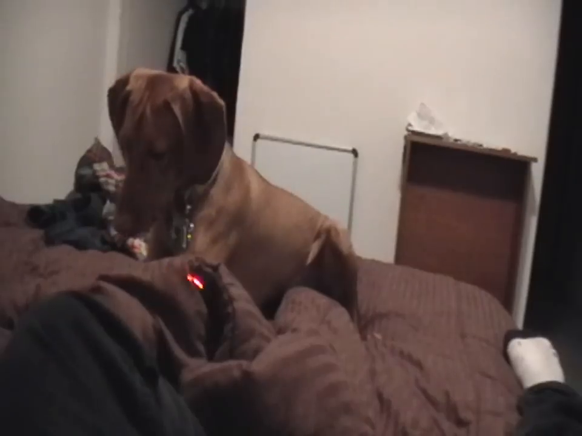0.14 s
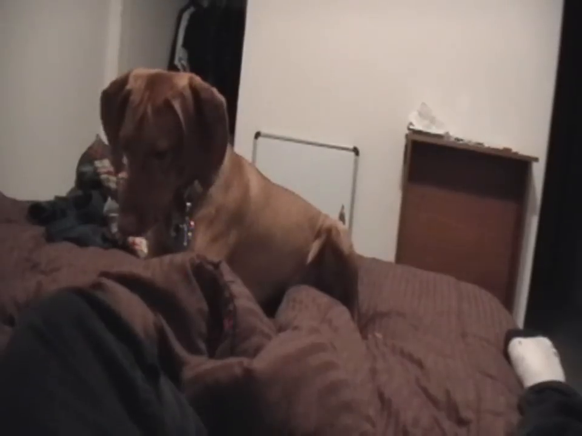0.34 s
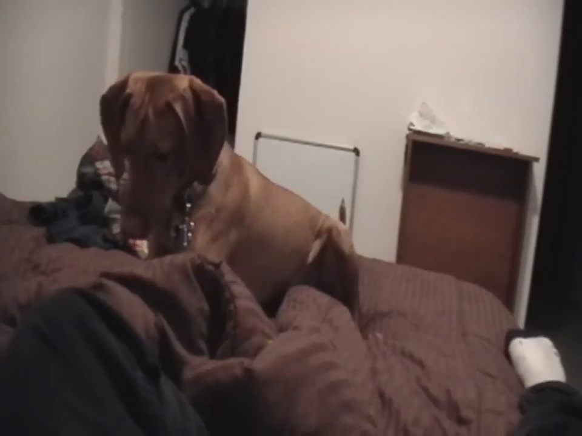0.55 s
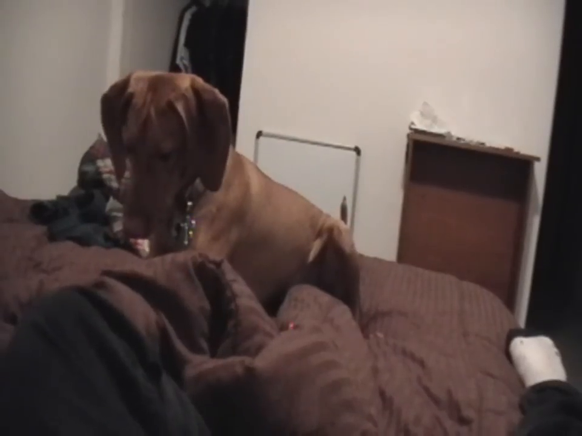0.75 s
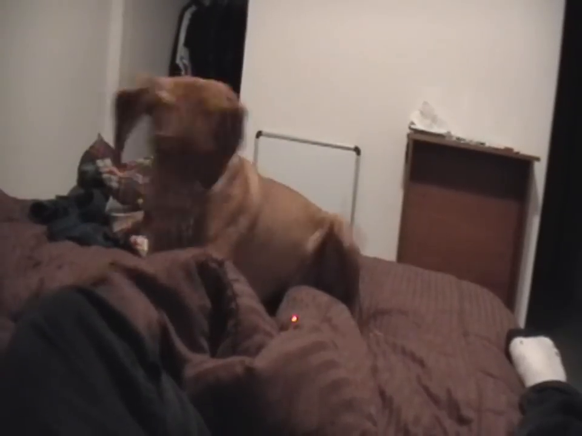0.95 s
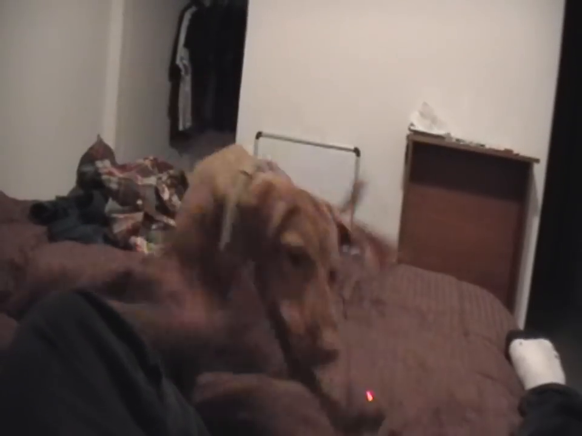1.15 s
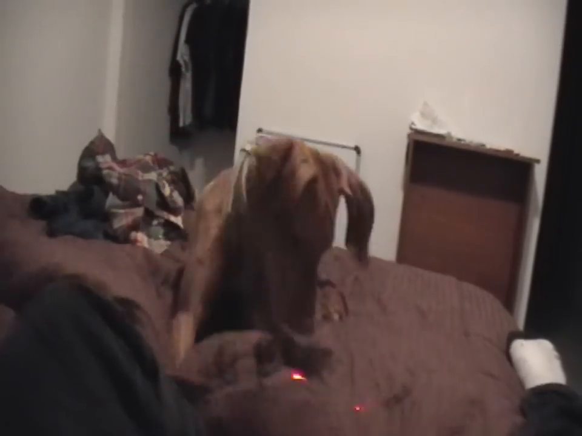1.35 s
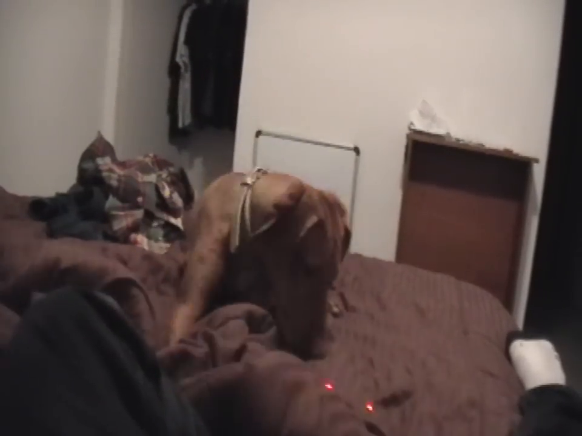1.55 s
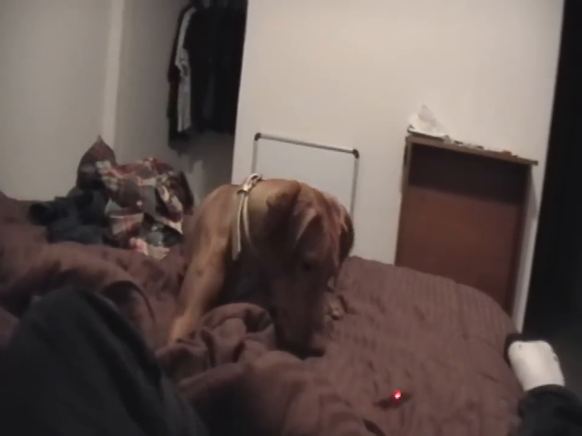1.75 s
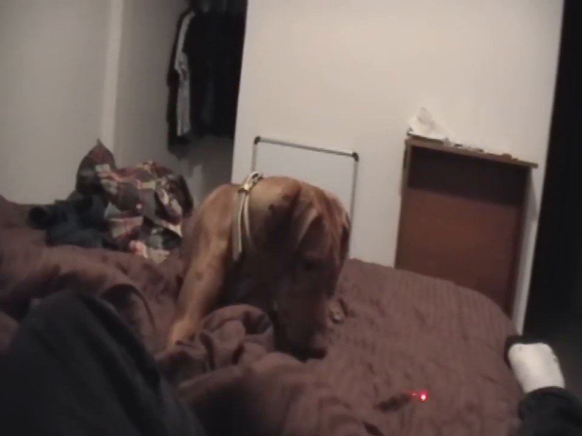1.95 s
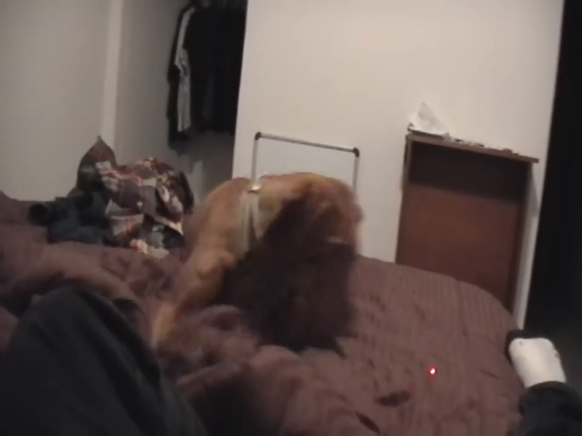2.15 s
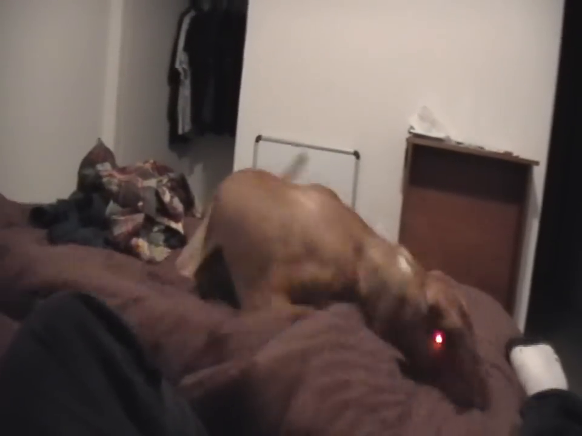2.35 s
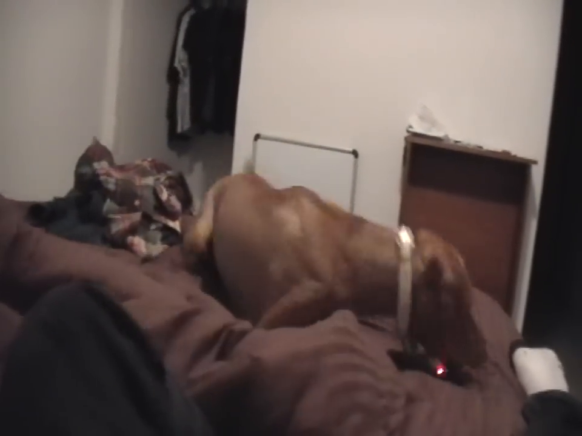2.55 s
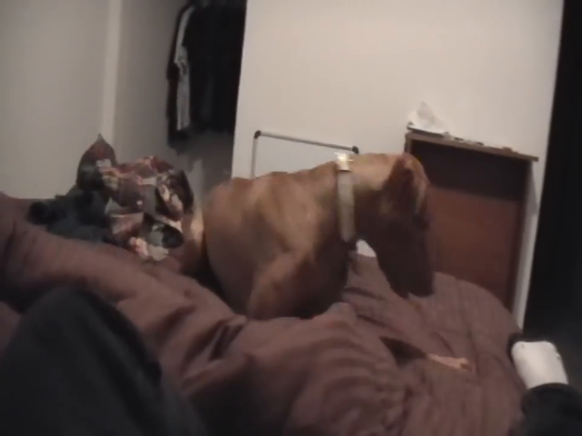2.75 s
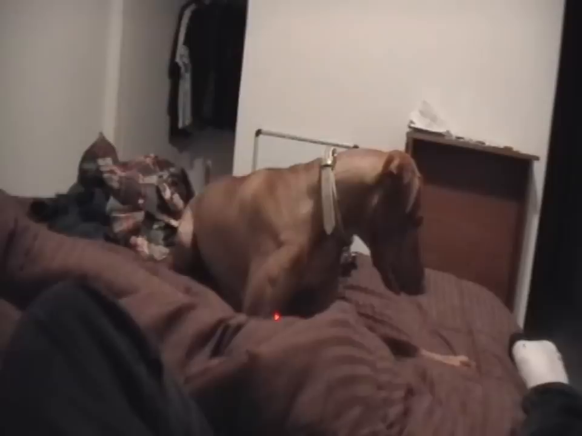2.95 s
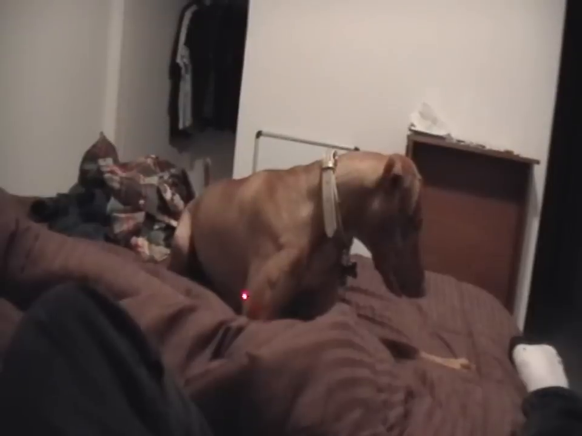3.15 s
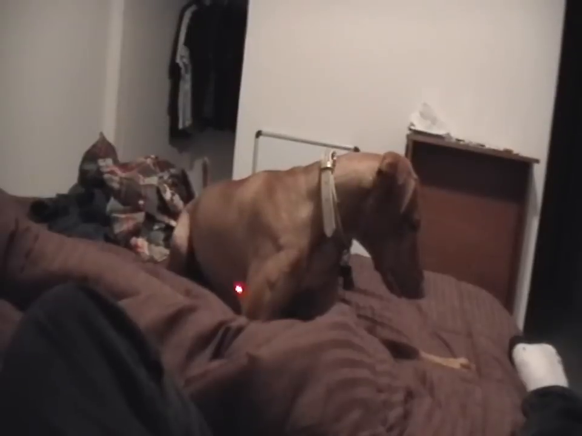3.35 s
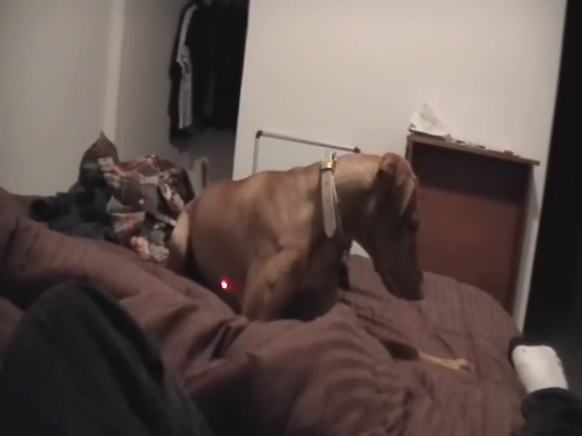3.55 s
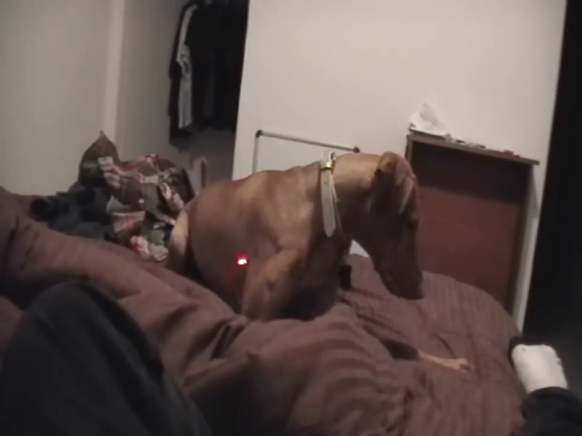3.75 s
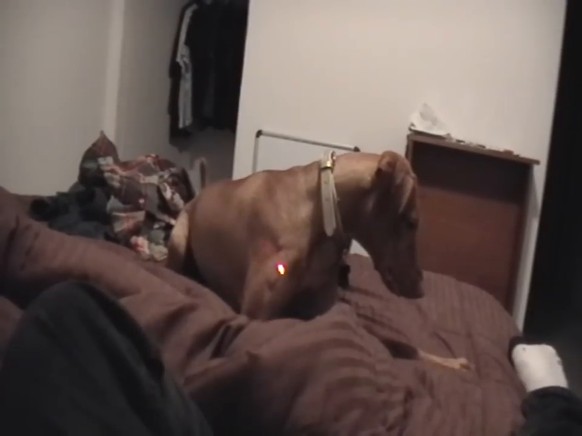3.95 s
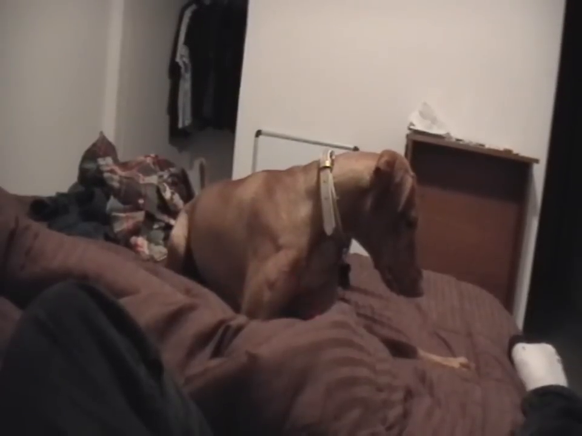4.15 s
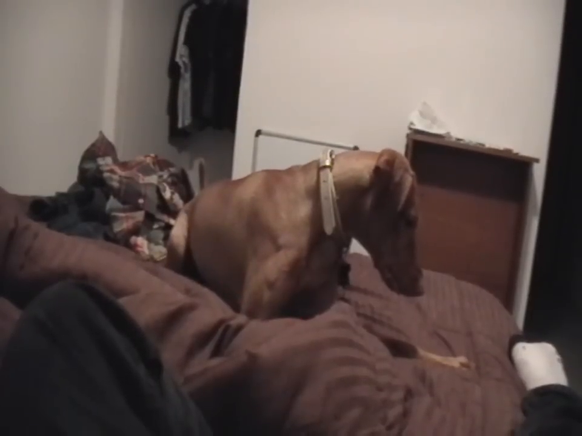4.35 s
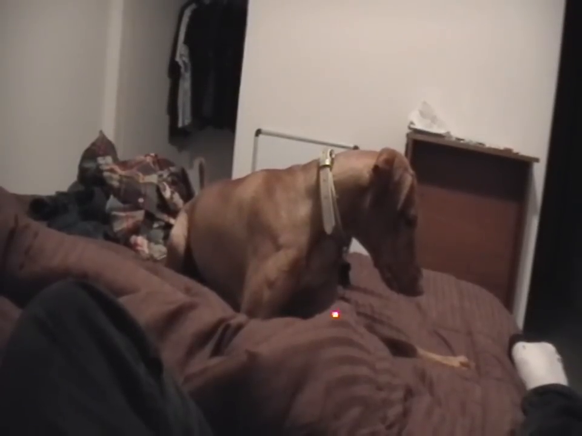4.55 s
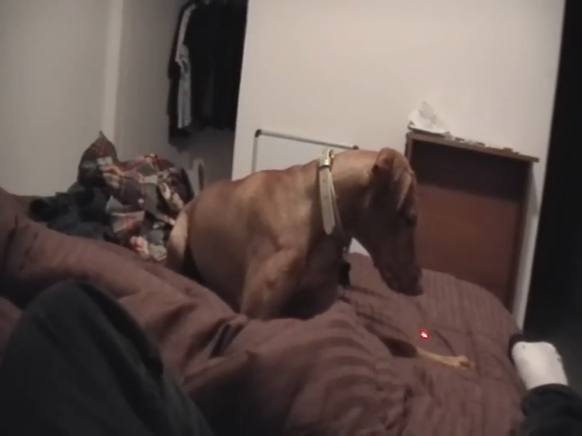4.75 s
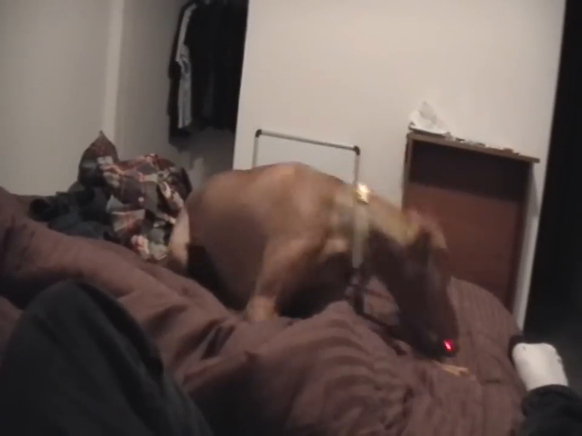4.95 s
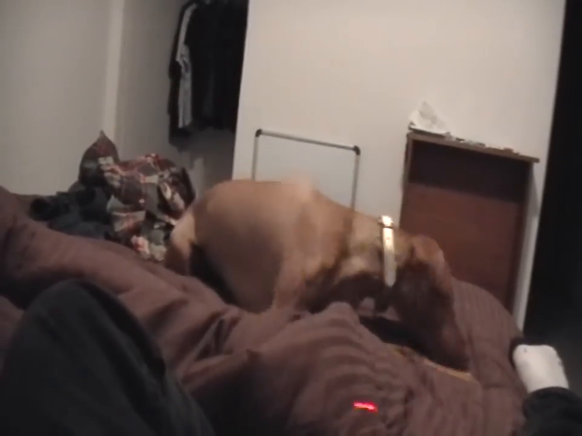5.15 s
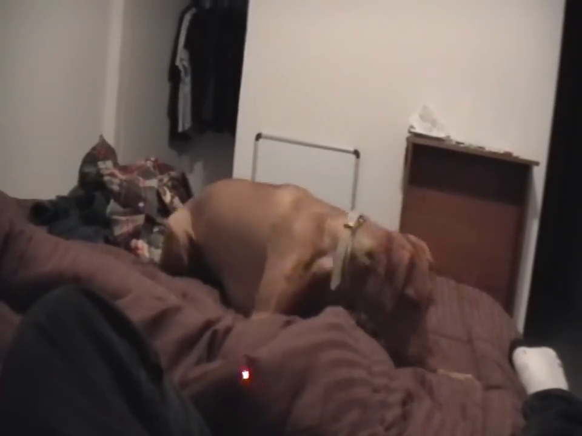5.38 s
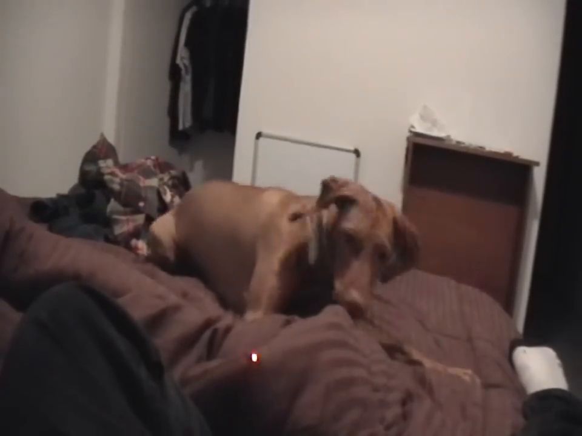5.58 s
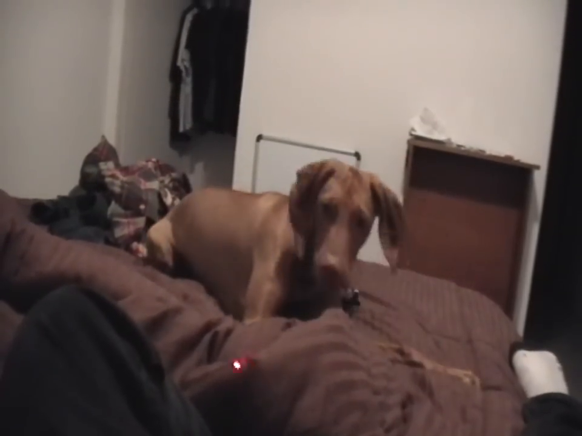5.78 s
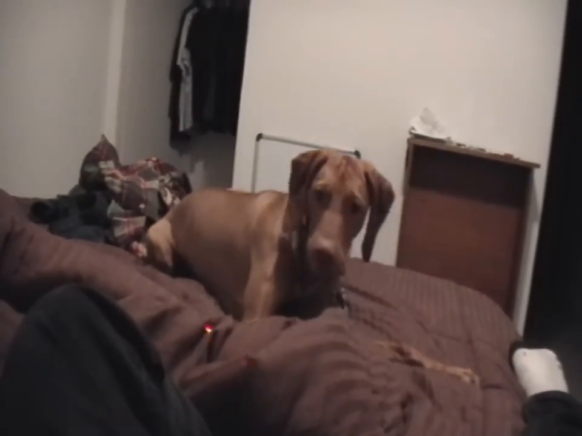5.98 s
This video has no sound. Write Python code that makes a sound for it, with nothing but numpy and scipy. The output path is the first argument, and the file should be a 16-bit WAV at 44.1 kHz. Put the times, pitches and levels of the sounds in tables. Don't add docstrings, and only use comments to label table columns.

```python
import sys
import numpy as np
from scipy import signal
from scipy.fft import rfft, irfft, next_fast_len
from scipy.io import wavfile
from scipy.ndimage import map_coordinates

SR = 44100
rng = np.random.default_rng(int(sys.argv[2]) if len(sys.argv) > 2 else 0)


def linear_from_db(decibels):
    return 10 ** (np.asarray(decibels, float) / 20)


def generate_wav(signal):
    frames = np.transpose(np.atleast_2d(signal))
    scaled = np.clip(frames, -1, 1) * 32767
    pcm = np.round(scaled).astype(np.int16)
    wavfile.write(sys.argv[1], SR, pcm)


N = 265437


def unit(x):
    return x / np.sqrt(np.mean(x ** 2) + 1e-20)


def along(points, hz):
    point_hz, value = np.transpose(points)
    return np.interp(np.log(hz + 1), np.log(point_hz + 1), value)


def wobble(rate, count=64):
    at = np.arange(0, N + count, count)
    knots = rng.standard_normal(int(N * rate / SR) + 4)
    return np.interp(np.arange(N), at, map_coordinates(knots, [at * rate / SR]))


def filtered(x, response):
    size = next_fast_len(N + SR // 2)
    hz = np.fft.rfftfreq(size, 1 / SR)
    return irfft(rfft(x, size) * response(hz), size)[..., :N]


def modes(peaks):
    def response(f):
        total = 0
        for k, (hz, width, db) in enumerate(peaks):
            loss = 1j * f * width
            total = total + (-1) ** k * linear_from_db(db) * loss / (hz * hz - f * f + loss)
        return total
    return response


def shaped(spectrum):
    return lambda hz: linear_from_db(along(spectrum, hz))


def spread(pair, response, alike):
    def mix(hz):
        turn = np.arccos(np.clip(along(alike, hz), -1, 1)) / 2
        return response(hz) * [np.cos(turn), np.sin(turn)]
    mid, side = filtered(pair, mix)
    return np.array([mid + side, mid - side])


# pitch in Hz, likeness from -1 to 1.
BED_LIKENESS = [(60, 1), (240, 1), (950, 0.83), (3770, 0.61), (15000, 0.67)]


def rush(response, alike=BED_LIKENESS):
    return unit(spread(rng.standard_normal((2, N)), response, alike))


def swells(rows, lift=0):
    t = np.arange(0, N + 32, 32) / SR
    power = 0
    for row in rows:
        peak_s, level_db, rise_s, fall_s = row[:4]
        away = np.maximum((peak_s - t) / rise_s, (t - peak_s) / fall_s)
        steep = away + 0.16 * away ** 3
        power = power + linear_from_db(2 * (level_db + lift * row[-1] - 20 * np.minimum(steep, 6)))
    return np.interp(np.arange(N) / SR, t, 10 * np.log10(power + 1e-14))


# pitch in Hz, level in dB per Hz.
AIR_COLOUR = [(15, -52.5), (25, -15.5), (90, -13), (108, 0), (130, -7), (144, -0.5), (257, -12.5),
              (380, -5.5), (494, -22.5), (548, -2.5), (750, -42), (833, -31.5), (1030, -9.5), (1730, -16.5),
              (13000, -39)]
# pitch in Hz, likeness from -1 to 1.
AIR_LIKENESS = [(60, 0.78), (240, -0.087), (950, -0.89), (3770, 0.075), (15000, 0.56)]
# pitch in Hz, rms level in dB.
MACHINE_TONES = [(118.4, -69), (376.8, -70), (608.3, -74.5), (845.2, -74), (1685, -78.5), (2530, -85.5),
                 (3957, -86)]


def air():
    t = np.arange(N) / SR
    swell, drift = linear_from_db(1.4 * wobble(12)), 0.81 * wobble(15)
    hum = sum(linear_from_db(db + 3) * np.sin(2 * np.pi * hz * t + drift) for hz, db in MACHINE_TONES)
    return linear_from_db(-64 + 5) * rush(shaped(AIR_COLOUR), AIR_LIKENESS) + swell * hum


# pitch in Hz, level in dB per Hz.
EARLY_COLOUR = [(24, -53), (40, -16), (363, -12), (499, -21), (878, -1.5), (2340, -25), (10700, -33),
                (14000, -46)]


def early_rustle():
    return linear_from_db(-43.5 + 1.5 * wobble(39)) * rush(shaped(EARLY_COLOUR))


# pitch in Hz, width in Hz, level in dB.
MATTRESS_MODES = [(89, 45.5, -2.5), (129.2, 34.3, 1.5), (200.4, 79, -7)]
# pitch in Hz, width in Hz, level in dB.
QUILT_MODES = [(214, 87, -1), (327, 89, 2), (439.7, 61, -3)]
# pitch in Hz, level in dB per Hz.
CLOTH_COLOUR = [(400, -40.5), (540, -9.5), (780, -2), (1200, -12.5), (1700, -14), (3200, -24),
                (4800, -29.5), (9000, -46.5), (14000, -69)]
# peak in seconds, level in dB, rise in seconds, fall in seconds per 20 dB.
WEIGHT_SHIFTS = [(.19, -43.5, 0.17, 2), (.55, -41, 0.99, 0.5), (.9, -32.5, 0.14, 0.21),
                 (1.15, -44.5, 0.55, 0.7), (1.37, -40.5, 0.14, 0.05), (1.86, -41.5, 0.064, 0.1),
                 (2.15, -36, 0.16, 0.27), (2.455, -32, 0.096, 0.1), (2.57, -39, .08, 0.05),
                 (2.7, -34.5, 0.085, 0.1747), (2.82, -49.5, .1, 0.4), (4.145, -38.5, 0.038, 0.15),
                 (4.62, -44, 0.056, 0.22), (5.1, -49.5, 0.17, 0.25), (5.57, -53, 0.14, .17),
                 (6.01, -63, .2, 2)]
# peak in seconds, level in dB, rise in seconds, fall in seconds per 20 dB,
# cloth over quilt in dB.
COVER_DRAGS = [(.11, -65, .02, 2, -3), (1.15, -40.5, .13, 0.32, -5.5), (1.22, -35, 0.026, 0.15, 4),
               (1.285, -31, 0.19, 0.0471, -17.5), (1.44, -43, 0.17, 0.29, 2),
               (1.605, -44.5, 0.019, 0.19, 1), (2.285, -47.5, 0.052, 0.23, -4),
               (2.42, -34.5, 0.089, 0.237, -4.5), (2.58, -46.5, .1, 0.04, -8),
               (2.69, -42.5, 0.096, 0.1457, 3.5), (2.82, -55, .08, 0.2, -2), (5.0, -47, 0.059, 0.32, 2.5),
               (5.12, -57.5, 0.061, 0.56, 7), (5.42, -55.5, 0.045, 0.8, -12)]
BED_REST_DB = [-67.5, -67.5, -67.5]


def bed():
    def together(*levels):
        return 10 * np.log10(sum(linear_from_db(2 * db) for db in levels))
    weight_db = swells(WEIGHT_SHIFTS)
    pressed_db = -58.5 + 0.35 * (weight_db + 45)
    mattress_db = together(weight_db, BED_REST_DB[0])
    quilt_db = together(swells(COVER_DRAGS), pressed_db, BED_REST_DB[1])
    cloth_db = together(swells(COVER_DRAGS, lift=0.9), BED_REST_DB[2])
    lump = wobble(14)
    boom = linear_from_db(mattress_db - 0.5 + 1.5 * lump) * rush(lambda f: modes(MATTRESS_MODES)(f) ** 2)
    thud_db = quilt_db + 0.41 * lump + 1.4 * wobble(25)
    thud = linear_from_db(thud_db) * rush(lambda f: modes(QUILT_MODES)(f) ** 2)
    rustle = linear_from_db(cloth_db + 0.59 * wobble(40)) * rush(shaped(CLOTH_COLOUR))
    return boom + thud + rustle


# start in seconds, peak in dB, pitch in Hz, time to fade 60 dB in seconds.
LANDINGS = [
    (1.837, -29, 96, 0.1),
    (2.409, -29, 275, .04),
    (2.436, -26.5, 260, 0.048),
    (2.454, -27, 300, .04),
    (2.474, -28, 247, .05),
    (2.55, -32, 253, .05),
    (2.617, -33.5, 280, .05),
    (2.656, -19.5, 125, 0.08),
    (4.123, -35.5, 126.5, .11),
    (4.599, -42, 80.7, 0.1),
]


def thumps():
    out, t = np.zeros(N + SR), np.arange(SR // 3) / SR
    for s, db, hz, t60 in LANDINGS:
        onset = 1 - np.exp(-t * hz / 0.8)
        swing = linear_from_db(db + 4.0 - 60 * t / t60) * onset * np.sin(2 * np.pi * hz * t)
        out[round(s * SR):][:len(t)] += swing
    return out[:N]


# peak in seconds, level in dB, rise in seconds, fall in seconds per 20 dB.
CLAW_SCUFFS = [
    (.11, -54, 0.0085, 0.3),
    (1.09, -56, 0.043, 0.3),
    (1.23, -55, 0.044, .3),
    (1.62, -51, .02, 0.17),
    (1.9, -67.5, .15, .2),
    (2.3, -55, .08, 0.6),
    (2.57, -44.5, .05, 0.05),
    (5.0, -54.5, 0.097, 0.64),
    (5.53, -55, 0.052, 0),
    (5.9, -72, .15, -5.5),
]
# pitch in Hz, level in dB per Hz.
WEAVE_COLOUR = [(1200, -30), (2000, -3.5), (2400, 0), (3400, -2.5), (5000, -8.5), (8000, -29.5)]
# start in seconds, length in seconds, first pitch in Hz, last pitch in Hz, level in dB.
NOSE_WHISTLE = (3.39, .13, 2680, 2330, -73)


def claws():
    s, length, from_hz, to_hz, db = NOSE_WHISTLE
    u = np.clip((np.arange(N) / SR - s) / length, 0, 1)
    phase = 2 * np.pi * np.cumsum(from_hz + (to_hz - from_hz) * u) / SR
    whistle = linear_from_db(db + 3.5 + 2.5 * wobble(39.9)) * np.sin(np.pi * u) ** 0.6 * np.sin(phase)
    return linear_from_db(swells(CLAW_SCUFFS) + 1.8 * wobble(45)) * rush(shaped(WEAVE_COLOUR)) + whistle


# pitch in Hz, width in Hz, level in dB.
LOOP_MODES = [(4080, 260, 0), (4270, 300, -3)]
# peak in seconds, level in dB, rise in seconds, fall in seconds per 20 dB.
LOOP_NUDGES = [
    (1.1, -52, .01, .03),
    (2.875, -62, .005, .06),
    (2.98, -61, .04, .2),
    (3.183, -58, .004, .06),
    (3.385, -67, .005, .2),
    (5.46, -60, .03, .1),
    (5.7, -62, .02, .2),
    (5.86, -59, .012, .08),
    (5.2, -59, .04, .12),
    (5.93, -65, .02, .15),
]


def loop():
    flutter_db = 2.5 * wobble(40) - 2
    return linear_from_db(swells(LOOP_NUDGES) + flutter_db) * rush(lambda f: modes(LOOP_MODES)(f) ** 2)


# start
# in seconds, rms level in dB, pitch in Hz, time to fade 60 dB in seconds.
COVER_PATS = [(1.085, -55, 818, .1), (1.158, -43, 800, 0.046), (1.206, -26, 340, .45),
              (1.206, -32, 756, 0.28), (1.207, -43, 1490, .25), (1.207, -44, 2480, 0.23),
              (1.42, -38, 774, 0.19), (1.598, -39, 720, 0.14), (1.6, -49, 3300, 0.17),
              (2.344, -41.5, 830, 0.093), (2.44, -38.5, 900, .12), (2.68, -39, 750, .3),
              (2.911, -44, 1700, 0.034), (4.99, -45.5, 776, 0.36), (4.99, -59, 2250, .4),
              (4.99, -60, 3450, .2), (5.11, -51, 820, .15), (5.13, -56, 2300, .3), (5.516, -49, 2300, .2)]


def pats():
    out, t = np.zeros(N + SR), np.arange(SR // 2) / SR
    f = np.fft.rfftfreq(len(t), 1 / SR)
    for s, db, hz, t60 in COVER_PATS:
        band = modes([(hz, 0.14 * hz, 0)])(f)
        front = 1 + 2.25 * linear_from_db(-60 * t / 0.0055)
        puff = rng.standard_normal(len(t)) * linear_from_db(-60 * t / t60) * front
        hollow = irfft(rfft(puff) * band, len(t)) / np.sqrt(np.mean(np.abs(band) ** 2))
        out[round(s * SR):][:len(t)] += linear_from_db(db) * hollow
    return out[:N]


# start in seconds, peak in dB, time to fade 60 dB in seconds.
PAW_SLAPS = [
    (1.205, -20.5, 0.53),
    (1.597, -34, 0.12),
    (2.43, -33, 0.17),
    (4.98, -40.5, 0.25),
]
# pitch in Hz, width in Hz, level in dB.
SLAP_MODES = [(279, 320, 2.5), (691, 160, -2.5), (1345, 37, -5), (1512, 17.5, 1.5)]


def paws():
    push, t = np.zeros(N + SR), np.arange(SR // 2) / SR
    for s, db, t60 in PAW_SLAPS:
        front = 1 + 5 * linear_from_db(-60 * t / 0.0063)
        flutter = linear_from_db(db + 4.5 - 60 * t / t60) * rng.standard_normal(len(t)) * front
        push[round(s * SR + 70):][:len(t)] += flutter

    def covers(f):
        notch = 1 - modes([(500, 130, 0)])(f)
        return modes(SLAP_MODES)(f) * notch / (1 + 1j * f / 2500)
    return filtered(push[:N], covers)


# pitch in Hz, level in dB, time to fade 60 dB in seconds.
SMALL_TAG = [(11400, 3, 0.12), (11480, 1, 0.12), (11350, -2, 0.07), (11440, -4, .18)]
# pitch in Hz, level in dB, time to fade 60 dB in seconds.
LARGE_TAG = [(6860, -3.5, 0.22), (6980, -1, 0.11), (6610, -5.5, 0.079)]
# pitch in Hz, level in dB per Hz.
LINK_COLOUR = [(900, -38), (1500, -13), (3200, -13.5), (5000, -10.5), (8000, -11.5), (11000, -12.5),
               (15000, -17.5), (17000, -41.5)]
# peak in seconds, level in dB, rise in seconds, fall in seconds per 20 dB,
# hum of the tags over the rattle in dB.
COLLAR_SHAKES = [(1.056, -61, 0.019, 0.8, -21.5), (1.124, -41.5, .03, 0.14, -18),
                 (1.18, -52.5, .05, 0.59, -5.5), (1.325, -48, 0.19, 0.06, -5.5),
                 (1.38, -41, .025, 0.46, -9), (1.59, -50, 0.057, 0.1547, 3), (1.87, -54.5, .15, 0.14, -7),
                 (2.28, -56, .045, 0.6, -25), (2.372, -34.5, 0.015, 0.3347, -5.5),
                 (2.55, -43.5, .12, 0.09, -5), (2.635, -42, .1, 0.03, -9), (4.97, -54.5, 0.074, .3, -19),
                 (5.2, -53.5, 0.2, .5, -19), (5.42, -62, .06, 0, -10), (5.49, -43, 0.044, 0.2, -3.5),
                 (5.75, -52.5, 0.19, 0.17, -4), (5.98, -62, .1, 0, -14)]


def rattle():
    level_db, hum_db = swells(COLLAR_SHAKES), swells(COLLAR_SHAKES, lift=1)
    touched = rng.random(N) < 2500 / SR
    strength = linear_from_db(2.4 * np.minimum(rng.exponential(size=N), 2.2))
    ticks = unit(touched * strength * rng.standard_normal(N))
    links = unit(filtered(ticks + 0.55 * rng.standard_normal(N), shaped(LINK_COLOUR)))

    def bell(tag):
        return unit(filtered(ticks, modes([(hz, 6 / t60, db) for hz, db, t60 in tag])))
    hum = linear_from_db(4.5) * bell(SMALL_TAG) + linear_from_db(5.5) * bell(LARGE_TAG)
    return linear_from_db(level_db + 2.5) * links + linear_from_db(hum_db) * hum


# start in seconds, click peak in dB, small tag ring in dB, large tag ring in dB.
TAG_STRIKES = [(0.1055, -23.5, -43, -54), (1.1197, -25, -37, -41), (1.1251, -19, -45, -48),
               (1.1352, -18, -31, -39.5), (1.352, -23, -45, -44.5), (1.3588, -12.5, -28.5, -25.5),
               (1.4093, -23, -39.5, -50), (1.4842, -22.5, -39, -29.5), (1.569, -40, -37.5, -42),
               (1.6052, -23.5, -26.5, -37.5), (1.6264, -39, -34, -62), (1.7511, -44, -44, -36),
               (2.3439, -28.5, -57.5, -36), (2.3678, -19.5, -26, -46), (2.4006, -17.5, -23.5, -48),
               (2.4103, -22, -19, -40), (2.431, -24, -21, -38), (2.47, -32, -28, -39),
               (2.4931, -28, -32, -46), (2.5531, -24.5, -36, -39.5), (2.6303, -19, -19, -40.5),
               (2.9124, -11, -48.5, -50), (3.0532, -22.5, -48, -60), (3.1797, -32, -48, -42),
               (3.2492, -22, -24, -28), (3.295, -50, -36, -38), (3.3335, -31.5, -51, -40),
               (5.1297, -36, -45, -42.5), (5.155, -30.5, -38.5, -41), (5.183, -23.5, -38, -40),
               (5.2299, -22.5, -38, -32.5), (5.467, -27.5, -41, -43), (5.5153, -18.5, -44, -30.5),
               (5.5501, -21, -29, -57), (5.7215, -30.5, -40, -47), (5.757, -28.5, -52, -36),
               (5.7739, -32, -48, -34)]
# start in seconds, click peak in dB.
RING_TICKS = [(1.0537, -33.5), (1.1405, -28), (1.157, -32), (1.3412, -19.5), (1.4481, -27), (1.4265, -30),
              (1.509, -32), (1.5215, -26), (1.6173, -27), (1.84, -40), (1.8541, -35), (2.352, -34),
              (2.3793, -19), (2.3846, -11.5), (2.395, -22), (2.558, -29), (2.5656, -27), (2.575, -30),
              (2.582, -22), (2.6258, -23.5), (2.9155, -19), (2.9251, -20), (2.9308, -26), (2.9467, -22),
              (3.0614, -32), (3.258, -27.5), (3.3816, -40), (3.405, -31), (5.1877, -32), (5.195, -38),
              (5.2598, -31), (5.269, -38), (5.458, -37), (5.476, -31), (5.4811, -32), (5.4875, -29),
              (5.53, -21.5), (5.5353, -24), (5.693, -31), (5.707, -33), (5.9223, -45), (5.9577, -44),
              (5.9636, -42), (5.9815, -43)]
# start in seconds, knock peak in dB, pitch in Hz.
BUCKLE_KNOCKS = [(1.0539, -35, 3300), (1.1198, -28, 3200), (1.1351, -30, 3500), (1.2088, -25, 3400),
                 (1.3412, -23, 3300), (1.3586, -26, 3600), (1.515, -35, 3500), (1.5325, -36, 4200),
                 (2.3223, -35, 3600), (2.3696, -19, 3200), (2.3785, -21, 3200), (2.3839, -18, 3100),
                 (2.493, -28, 3100), (2.558, -30, 2900), (2.567, -29, 3100), (2.8698, -38, 3750),
                 (3.1795, -38, 4100), (3.2493, -29, 3400), (3.3334, -44, 3000), (3.3812, -43, 3500),
                 (4.1755, -47, 3300), (4.951, -49, 3300), (5.129, -40, 3100), (5.155, -42, 3000),
                 (5.183, -35, 4000), (5.2297, -33, 3300), (5.238, -34, 3800), (5.2598, -39, 4000),
                 (5.2786, -38, 3800), (5.55, -33, 3200), (5.593, -40, 4000), (5.677, -40.5, 3900),
                 (5.707, -40, 3300), (5.738, -43, 3700), (5.772, -41, 4000), (5.79, -42, 4100),
                 (5.9636, -46, 3400), (5.9815, -47, 3500)]


def contacts():
    usual_hz = 3300
    strikes = [(s, db, db - 13, usual_hz, small, large) for s, db, small, large in TAG_STRIKES]
    ticks = [(s, db, db - 17, usual_hz, db - 27.5, db - 37) for s, db in RING_TICKS]
    knocks = [(s, db - 10, db, hz, db - 34, db - 34) for s, db, hz in BUCKLE_KNOCKS]
    return strikes + ticks + knocks


def ring(tag, t, luck):
    tone = 0
    for (hz, db, t60), (strength, bend, facing) in zip(tag, luck):
        side = hz / 21000 * facing * np.array([[1], [-1]])
        swing = np.sin(2 * np.pi * hz * (1 + 0.0025 * bend) * t + side)
        tone = tone + linear_from_db(db + 3.4 * strength - 60 * t / t60) * swing
    early = np.std(tone[:, :SR // 50])
    onset, ending = 1 - np.exp(-t / 0.0012), np.cos(np.pi / 2 * t / t[-1])
    return tone / (early + 0.2) * onset * ending


def click(t):
    hz = np.fft.rfftfreq(len(t), 1 / SR)
    colour_hz, floor_hz = 9300 * (1 + 0.055 * rng.standard_normal()), 1900
    burst = rng.standard_normal(len(t)) * (linear_from_db(-60 * t / 0.0025) + 0.2 * linear_from_db(-60 * t / 0.014))
    burst[0] = 3.2
    body = modes([(colour_hz, 1.15 * colour_hz, 0)])(hz) ** 2 / (1 + (hz / 12500) ** 6)
    small = modes([(floor_hz, 2 * floor_hz, 0)])(hz) * 1j * hz / floor_hz
    sound = irfft(rfft(burst) * body * small, len(t))
    return sound / np.abs(sound).max()


def tags():
    out, t = np.zeros((2, N + SR)), np.arange(SR // 6) / SR
    short = t[:512]
    small_spin, large_spin = [np.pad(3.5 * np.minimum(wobble(90), 0.6), (0, SR)) for _ in range(2)]
    for s, click_db, knock_db, knock_hz, small_db, large_db in contacts():
        luck = rng.standard_normal((2, 4, 3))
        pan_db, bend = rng.normal(0, 1.0), rng.normal(0, 0.04)
        knock = -np.sin(2 * np.pi * knock_hz * (1 + bend) * short) * linear_from_db(-60 * short / 0.0045)
        at = slice(round(s * SR), round(s * SR) + len(t))
        sound = linear_from_db(small_db - 2.5 + small_spin[at]) * ring(SMALL_TAG, t, luck[0])
        sound += linear_from_db(large_db - 5.5 + large_spin[at]) * ring(LARGE_TAG, t, luck[1])
        sound[:, :len(short)] += linear_from_db(click_db + 3.0) * click(short) + linear_from_db(knock_db - 1.5) * knock
        out[:, at] += sound * linear_from_db([[pan_db], [-pan_db]])
    return out[:, :N]


# pitch in Hz, time to fade 60 dB in seconds.
ROOM_FADE = [(200, 0.43), (3000, 0.45), (8000, 0.39), (14000, 0.23)]


def room(x, gap_s=0.003):
    out, part, length = np.zeros((2, N + SR)), SR // 2, SR // 3
    for start in range(0, N, part):
        hz, t, z = signal.stft(rng.standard_normal((2, length)), SR, nperseg=256)
        fade = linear_from_db(-60 * t / along(ROOM_FADE, hz)[:, None])
        tail = signal.istft(z * fade, SR, nperseg=256)[1]
        wet = signal.fftconvolve(x[None, start:start + part], tail / np.linalg.norm(tail[0]), axes=1)
        out[:, start + round(gap_s * SR):][:, :wet.shape[1]] += wet
    return spread(out[:, :N], np.ones_like, [(300, 1.0), (4000, 0.69), (11000, 0.31), (13000, 0.0031)])


# start in seconds, end in seconds.
SILENCE = (.0825, .1035)


def scene():
    strikes, links, slaps = tags(), rattle(), paws() + pats()
    walls = room(linear_from_db(-2.5) * strikes.mean(0) + linear_from_db(-10.5) * links + linear_from_db(-4.5) * slaps)
    puppy = strikes + linear_from_db(-3) * links + slaps + bed() + thumps() + claws() + loop()
    after = puppy + walls + air()
    t = np.arange(N) / SR
    before = early_rustle() * np.clip((SILENCE[0] - t) / 0.0013, 0, 1)
    hiss = linear_from_db(-93.5) * rng.standard_normal((2, N))
    return before + after * (t > SILENCE[1]) + hiss


def open_treble(dry):
    hz, _, z = signal.stft(dry, SR, nperseg=1024)
    treble = z[:, (hz > 8000) & (hz < 10800)]
    treble_db = 10 * np.log10(np.sum(np.abs(treble) ** 2, axis=(0, 1)) / 2 + 1e-12)
    jump_db = np.clip(np.diff(treble_db, prepend=0) - 13.0, 0, 12)
    step = SR / 128
    wanted_hz = 12050 + 82 * (treble_db + 76) + 45 * jump_db
    top_hz = np.clip(step * np.round(wanted_hz / step), 12050, 16200)
    return signal.istft(z * (hz[:, None] < top_hz), SR, nperseg=1024)[1][:, :N]


def roll_off(x):
    return signal.sosfilt(signal.butter(12, 16180, fs=SR, output="sos"), x)


def record(dry):
    mix = open_treble(dry)
    return roll_off(mix)


dry = scene()
out = record(dry)
generate_wav(out)
```